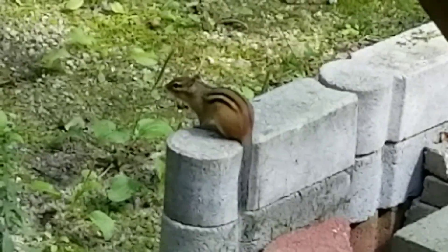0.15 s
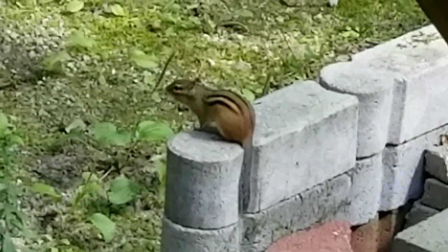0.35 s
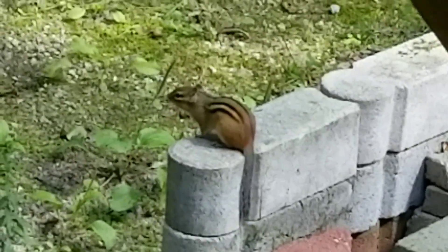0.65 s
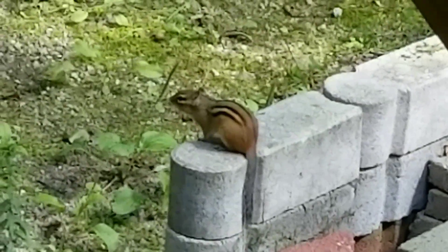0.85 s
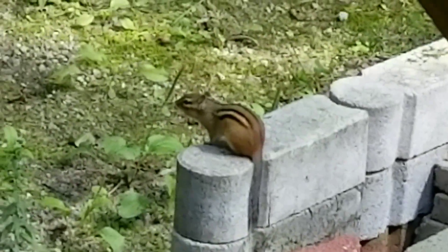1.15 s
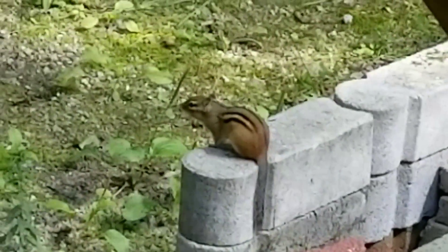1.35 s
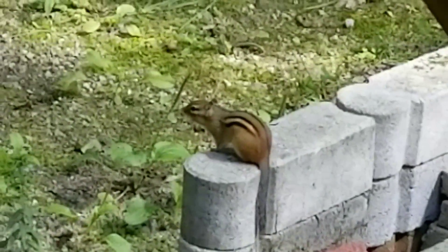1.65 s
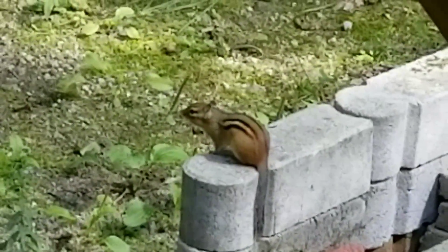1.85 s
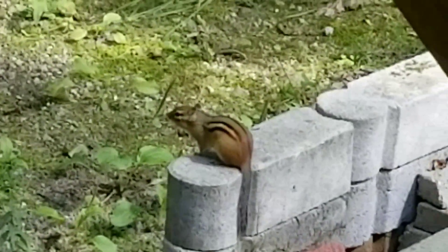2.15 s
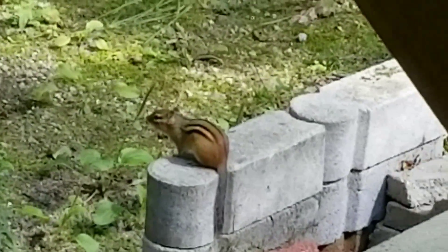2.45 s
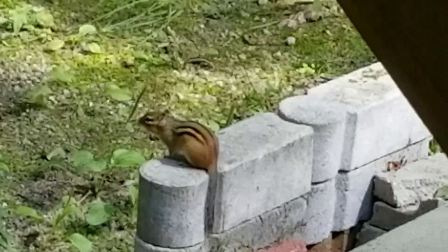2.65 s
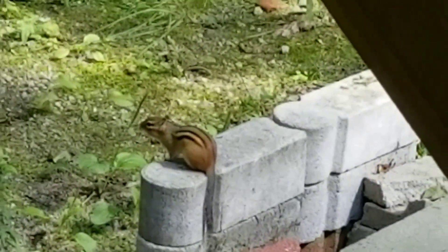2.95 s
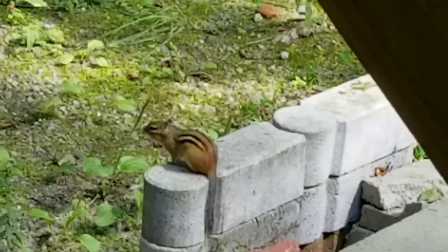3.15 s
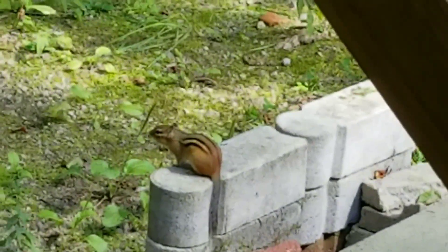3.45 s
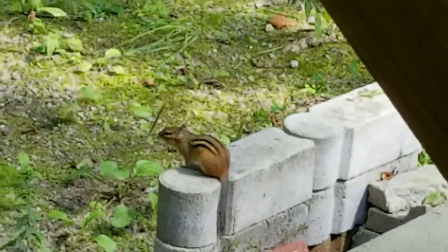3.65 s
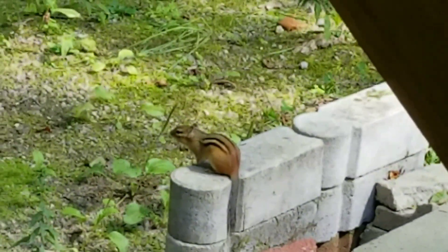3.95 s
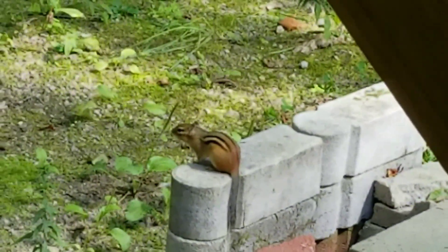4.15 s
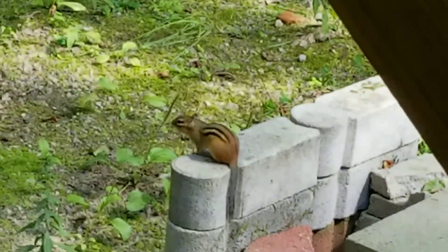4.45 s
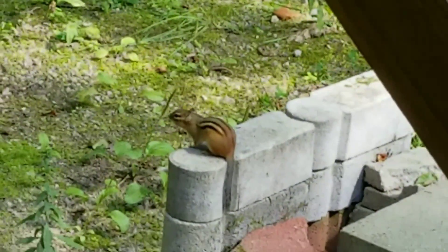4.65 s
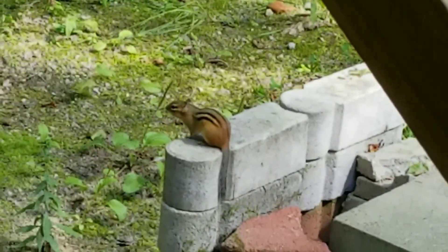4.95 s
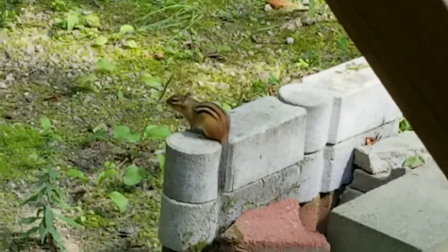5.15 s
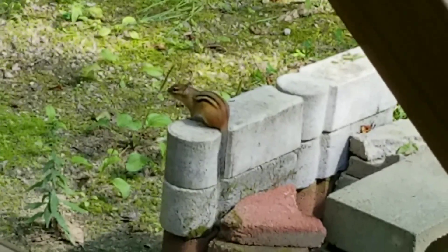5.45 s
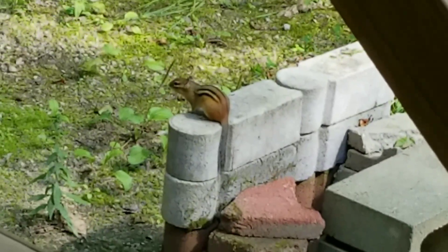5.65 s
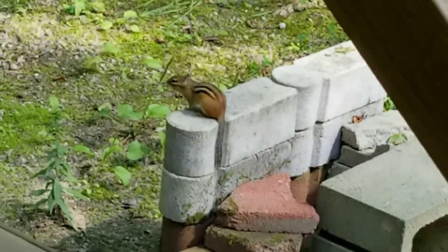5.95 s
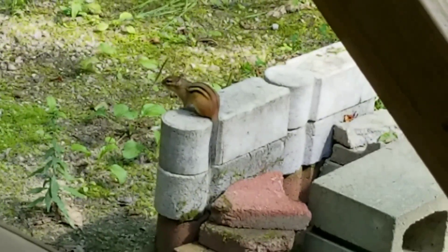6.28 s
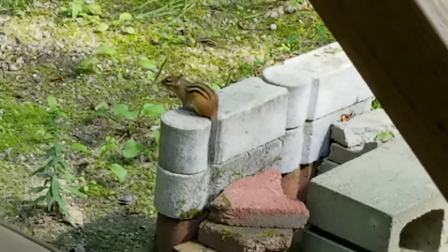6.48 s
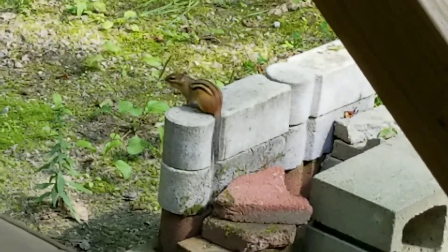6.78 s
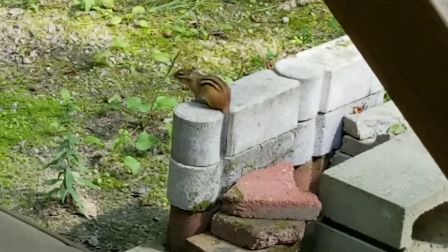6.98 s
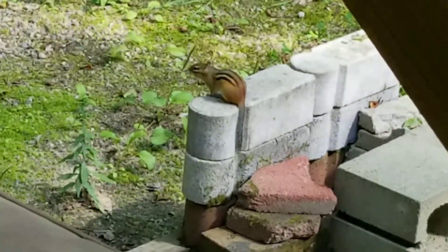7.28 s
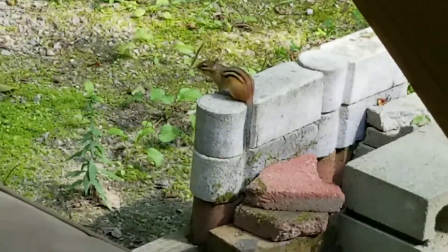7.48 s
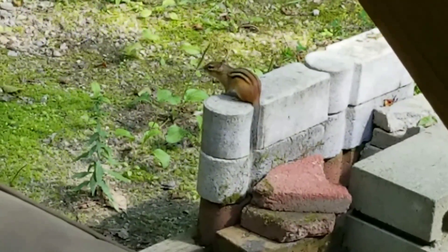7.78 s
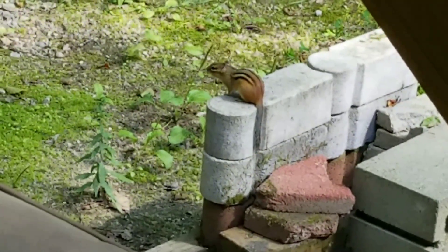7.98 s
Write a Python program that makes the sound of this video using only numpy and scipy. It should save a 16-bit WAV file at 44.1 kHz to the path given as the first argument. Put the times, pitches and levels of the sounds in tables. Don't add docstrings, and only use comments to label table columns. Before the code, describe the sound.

For about 8 seconds a chipmunk calls from a garden wall near a house, heard on a handheld phone a few metres away. The first sharp chip lands right at 0 s, followed by others at about 0.4, 0.8, 1.2 and 1.65 s, then every 0.4 to 0.5 s until the last near 7.7 s. Each lasts only a few hundredths of a second: a bright whistle dives from about 9 kHz to below 2 kHz and ends in a tiny cluck. Close walls add tight, clattery echoes; the yard leaves a faint tail. Underneath, very quiet, a compressor hums and beats, traffic rumbles, distant engines swell and fade, and hiss stays steady. A soft hand thump comes at 2 s, leaves stir at 4 and 7.9 s, and barely audible distant birds sound around 1.4 and 7.5 s.

```python
import sys
import numpy as np
from scipy import signal
from scipy.fft import rfft, irfft, next_fast_len
from scipy.io import wavfile
from scipy.ndimage import uniform_filter1d, map_coordinates

SR = 44100
rng = np.random.default_rng(int(sys.argv[2]) if len(sys.argv) > 2 else 0)


def boost(x):
    u = np.asarray(x, float) / 20
    return 10 ** u


def wav_out(sig):
    wavfile.write(sys.argv[1], SR, np.round(np.clip(np.atleast_2d(sig).T, -1, 1) * 32767).astype(np.int16))


N = 358091


def unit(x):
    return x / np.sqrt(np.mean(x ** 2) + 1e-20)


def along(points, hz):
    f, v = np.transpose(points)
    return np.interp(np.log(hz + 1), np.log(f + 1), v)


def curve(points):
    return np.interp(np.arange(N) / SR, *np.transpose(points))


def wobble(rate):
    coarse = np.arange(0, N + 64, 64)
    knots = rng.standard_normal(int(N * rate / SR) + 4)
    return np.interp(np.arange(N), coarse, map_coordinates(knots, [coarse * rate / SR]))


# freq_hz [Hz], left_right_likeness [-1..1]
ALIKE = [(60, 1.0), (240, 1), (950, 0.93), (3770, 0.85), (15000, 0.83)]


def rush(spectrum, patchy_db):
    hz, t, z = signal.stft(rng.standard_normal((2, N)), SR, nperseg=2048)
    field = rng.standard_normal(z.shape[1:])
    field = uniform_filter1d(uniform_filter1d(field, size=12, axis=0), size=4, axis=1)
    angle = np.arccos(np.clip(along(ALIKE, hz), -1, .995)) / 2
    mid_side = boost(along(spectrum, hz)) * [np.cos(angle), np.sin(angle)]
    z *= boost(patchy_db * unit(field)) * mid_side[:, :, None]
    mid, side = signal.istft(z, SR, nperseg=2048)[1][:, :N]
    return unit(np.array([mid + side, mid - side]))


# time_s [s], level_db [dB]
AIR = [(0.0, -66), (1.4, -66.5), (1.7, -68), (2.96, -67), (3.1, -65), (3.5, -68), (4.14, -66), (5.43, -68),
       (8.12, -67.5)]
# freq_hz [Hz], density_db [dB per Hz]
TRAFFIC = [(15, -34.5), (25, -9.5), (48, -6.5), (69, -3), (130, -10), (237, -15.5), (637, -19),
           (810, -30.5), (900, -30), (1170, -82.5), (1980, -120)]
# freq_hz [Hz], density_db [dB per Hz]
HISS = [(410, -41), (700, -7.5), (851, -9.5), (1100, -6.5), (1190, -3), (1380, -15.5), (1680, -4.5),
        (2040, -11), (2580, -15), (3720, -20), (4340, -13.5), (8230, -22.5), (10400, -19.5), (15800, -23)]
TRAFFIC_DB, HISS_DB = 5, -71.5


def background():
    traffic_level = boost(curve(AIR) + TRAFFIC_DB + 1.1 * wobble(7.1))
    traffic = traffic_level * rush(TRAFFIC, patchy_db=1.0)
    return traffic + boost(HISS_DB) * rush(HISS, patchy_db=-1.7)


# middle_s [s], length_s [s], level_db [dB], pitch_hz [Hz]
DRONES = [(.1, .6, -73, 434), (.62, .3, -71, 431), (.92, .45, -66.5, 432), (1.4, .8, -73, 433),
          (2.45, .6, -75, 432), (3.1, .8, -66.5, 432), (4.3, 1.2, -74, 434), (6.5, .8, -76, 435),
          (7.8, .7, -77, 430), (7.2, 2.6, -71, 137), (6.2, 3.6, -71, 96), (1.5, 3.5, -75, 96)]


def drones():
    t, out = np.arange(N) / SR, np.zeros(N)
    shake, drift = boost(2 * wobble(9)), .9 * wobble(6)
    for s, length, db, hz in DRONES:
        on = abs(t - s) < length / 2
        swell = np.cos(np.pi * (t[on] - s) / length) ** 2
        out[on] += boost(db) * swell * np.sin(2 * np.pi * hz * t[on] + drift[on])
    return np.sqrt(2) * shake * out


# time_s [s], shaft_hum_db [dB rms]
LOAD = [(0.0, -63), (0.27, -55), (1.11, -67), (1.67, -58.5), (1.79, -66), (1.99, -54.5), (4.57, -63),
        (4.95, -55.5), (5.38, -58.5), (6.76, -58.5), (7.17, -71.5), (7.4, -60.5), (8.05, -60), (8.12, -71)]
# multiple_of_shaft_rate [ratio], level_db [dB rms]
WHINE = [(8.19, -78.5), (10.03, -113), (11.04, -81), (15, -80.5), (18, -93.5), (21.03, -83), (25.02, -82.5),
         (27.99, -82.5), (28.99, -80), (31.01, -87.5), (33.04, -85.5)]
MOTOR_HZ, MAINS_HZ = 58.5, 119.97
CANCEL_S = 2.09
MAINS_DB, TWICE_DB, THRICE_DB = -68, -70.5, -83


def compressor():
    t = np.arange(N) / SR
    turn = 2 * np.pi * MOTOR_HZ * (t - CANCEL_S)
    hum = boost(curve(LOAD) + 0.66 * wobble(3.2)) * np.sin(turn + .3 * wobble(8.7))
    hum += boost(THRICE_DB) * np.sin(3 * turn)
    mains = boost(MAINS_DB) * np.sin(2 * np.pi * MAINS_HZ * (t - CANCEL_S))
    beat = mains - boost(TWICE_DB + 0.83 * wobble(2)) * np.sin(2 * turn)
    whine = sum(boost(db + 1.5 * wobble(4)) * np.sin(k * turn + 0.4 * wobble(6)) for k, db in WHINE)
    return np.sqrt(2) * (hum + beat + whine)


# start_s [s], level_db [dB], low_hz [Hz], high_hz [Hz], length_s [s]
RUSTLES = [
    (1.99, -52, 70, 150, .024),
    (4.005, -63.5, 600, 1100, .11),
    (4.01, -70, 1200, 2900, .09),
    (1.40, -72, 3800, 4150, .32),
    (7.45, -76, 3050, 3400, .36),
    (7.83, -75, 2200, 3800, .29),
    (7.88, -72, 700, 1300, .24),
]


def rustles():
    out, t = np.zeros(N + SR), np.arange(SR) / SR
    for s, db, low_hz, high_hz, length in RUSTLES:
        grain_db = 3 * rng.standard_normal(SR // 64 + 1).repeat(64)[:SR]
        grains = rng.standard_normal(SR) * boost(grain_db)
        resonance = signal.butter(2, [low_hz, high_hz], "bandpass", fs=SR, output="sos")
        puff = np.sin(np.pi * np.clip(t / length, 0, 1)) ** 2
        out[round(s * SR):][:SR] += boost(db) * unit(signal.sosfilt(resonance, grains)) * puff
    return out[:N]


# delay_s [s], level_db [dB at 5 kHz], brightness [dB per octave]
PATHS = [(0, -3.5, -4.5), (.0007, -25.5, 13), (.0017, -13, -4.5), (.0025, -23, -12), (.0034, 1, -4),
         (.0044, -5, 1.5), (.0063, -13.5, -7), (.0090, -8, 6), (0.012, -9, 8.5), (0.0147, -10, 9),
         (0.0187, -14.5, 6), (0.0214, -9, 1.5), (0.022, -13.5, -9.5), (0.0255, -16.5, -2),
         (0.033, -21, -12), (0.0358, -16, -8)]
# freq_hz [Hz], gain_db [dB]
BEAM = [(1200, 3), (2400, 5), (3500, -8), (4600, 1), (6200, 1.5), (9000, 2), (12000, 11), (15000, 16)]
# delay_s [s], level_db [dB]
HOUSE = [(.0082, -4.5), (.0128, -6.5), (.0265, -10)]
HOUSE_HZ = 1700
ECHO_BASS_DB = -5
SHAKE_DB = 1.1
PAN_DB, PAN_SCATTER_DB = .6, 1.0


def paths(s, hz, shake):
    delay, level_db, tilt_db = np.transpose(PATHS)
    octaves = np.log2(np.clip(hz, 1200, 14000) / 5000)
    gain = boost((level_db + SHAKE_DB * shake[:, 0])[:, None] + np.outer(tilt_db, octaves))
    gain[0] *= boost(along(BEAM, hz))
    gain[1:] *= boost(ECHO_BASS_DB * np.log2(3000 / np.clip(hz, 1000, 3000)))
    delay = delay + 5e-5 * s * (delay > .002)
    arrival = gain * np.exp(-2j * np.pi * np.outer(delay + 1.5e-5 * shake[:, 1], hz))
    bass = sum(boost(db) * np.exp(-2j * np.pi * late * hz) for late, db in HOUSE)
    bass = bass / (1 + (hz / HOUSE_HZ) ** 6)
    pan = boost(np.outer([.5, -.5], PAN_DB + PAN_SCATTER_DB * shake[:, 2]))
    return pan @ arrival + bass


def tail(decays, noise, rise):
    hz, t, z = signal.stft(noise, SR, nperseg=256)
    decay = boost(-60 * t / along(decays, hz)[:, None])
    out = signal.istft(z * decay, SR, nperseg=256)[1][:, :noise.shape[1]]
    out *= 1 - np.exp(-np.arange(out.shape[1]) / SR / rise)
    return out / np.linalg.norm(out[0])


BLOCK, BLOCK_START = 1024, 598


def smear(chip, start, blur):
    attack = round(.03 * SR)
    early = (start + attack - BLOCK_START) % BLOCK
    since = np.arange(4096) - attack + early
    noise = irfft(abs(rfft(chip[:, :4096])) * np.exp(2j * np.pi * blur))
    level_db = -14.5 - np.clip((early - 560) / 14, 0, 15)
    return boost(level_db) * noise * np.clip(since / 30, 0, 1) * np.clip((1500 - since) / 500, 0, 1)


# since_5khz_s [s from the 5 kHz passage], pitch_hz [Hz]
FALL = [(-.0185, 9000), (-.0130, 8830), (-.0090, 8380), (-.0063, 7700), (-.0033, 6727), (.0003, 5272),
        (.0026, 4632), (.0098, 3200), (.0185, 1750)]
# since_5khz_s [s from the 5 kHz passage], effort_db [dB]
EFFORT = [(-.0205, -72), (-.0180, -20.5), (-.0135, -12), (-.0115, -11), (-.0092, -6.5), (.0022, 1),
          (.0078, -8.5), (0.0117, -27.5), (.0178, -30.5)]
# multiple [ratio], level_db [dB]
OVERTONES = [(2, -11.3), (3, -21)]
FADE_S = .0025
CLUCK_S, CLUCK_ATTACK_S, CLUCK_HOLD_S, CLUCK_RELEASE_S = .0180, .0030, .0036, .0028
CLUCK_DB, CLUCK_HZ, CLUCK_SAG_HZ_PER_S = -26.5, 1330, 20000


def whistle(first_hz, stretch, cluck_db, flutter):
    t = np.arange(4096) / SR - .03
    lead = np.clip(-t / .018, 0, 1) ** 2
    warped = t / (1 + (stretch - 1) * lead)
    since = t - CLUCK_S
    hz = np.interp(warped, *np.transpose(FALL)) + (first_hz - FALL[0][1]) * lead ** 1.5
    hz = np.where(since > 0, CLUCK_HZ - CLUCK_SAG_HZ_PER_S * since, hz)
    phase = 2 * np.pi * np.cumsum(hz) / SR
    tone = np.sin(phase)
    for k, db in OVERTONES:
        audible = np.clip((20000 - k * hz) / 2000, 0, 1)
        tone = tone + boost(db) * np.sin(k * phase) * audible
    end = CLUCK_ATTACK_S + CLUCK_HOLD_S + CLUCK_RELEASE_S
    cluck = np.clip(np.minimum(since / CLUCK_ATTACK_S, (end - since) / CLUCK_RELEASE_S), 0, 1) ** 2
    breath = boost(np.interp(warped, *np.transpose(EFFORT), -120, -120)) * np.clip(-since / FADE_S, 0, 1)
    level = breath + boost(CLUCK_DB + cluck_db) * cluck
    uneven_db = .9 * map_coordinates(flutter, [np.arange(4096) / 70])
    return level * boost(uneven_db) * tone


# at_5khz_s [s], level_db [dB], first_pitch_hz [Hz], lead_in_stretch [ratio], cluck_db [dB]
CHIPS = [(-.0230, -22.5, 9150, 1.18, -2.5), (0.3956, -23, 9930, 1.16, -1.5), (0.8017, -23, 8810, 0.86, -2),
         (1.2021, -23, 8710, 0.96, -3), (1.6556, -23.5, 9340, 1.04, -3), (2.0734, -23, 9150, 0.92, -1),
         (2.5219, -23.5, 9430, 1.08, -1.2), (2.959, -23.5, 8800, 0.89, -2), (3.381, -23.5, 9160, 1.08, -2),
         (3.7931, -23, 8900, .94, -1.2), (4.2443, -23.5, 9320, 0.99, -3.5),
         (4.6862, -23.5, 9150, 0.93, 1.1), (5.1254, -23.5, 8940, 0.93, 0), (5.5200, -23, 8770, 0.94, -1),
         (5.9365, -23, 8640, 0.93, -1), (6.377, -23.5, 9100, 1.07, 0), (6.7905, -23.5, 9230, 0.94, -2),
         (7.2494, -23, 8730, 0.94, -2), (7.7347, -23.5, 8720, 1.04, 1.5)]
# freq_hz [Hz], gain_db [dB]
COLOUR = [(850, 24.5), (1200, -7), (2000, -7.5), (2950, -16.5), (3800, -3.5), (4500, 1.4), (5200, -4),
          (5900, -7), (7400, 0), (9000, -9.5), (10200, -18.5), (11500, -24), (12900, -2), (15500, -8)]
# freq_hz [Hz], t60_s [s]
NOOK = [(1000, 0.54), (4500, 0.18), (8000, 0.18), (14000, 0.13)]
# freq_hz [Hz], level_db [dB]
SCATTER = [(1200, -4), (2500, 6.5), (4500, -5.5), (8000, 1.5), (14000, 11)]
# freq_hz [Hz], t60_s [s]
YARD = [(1000, 1), (4500, 0.69), (8000, 0.67), (14000, 0.7)]
# time_s [s], left_minus_right_db [dB]
TURN = [(0, .4), (2.2, .2), (2.8, .7), (5, .9), (5.8, 1.4), (8.1, 1.4)]
THROAT_LOW_HZ = 1020


def chipmunk():
    near, far, pad = 12288, 2 ** 15, SR // 10
    hz, far_hz = np.fft.rfftfreq(near, 1 / SR), np.fft.rfftfreq(far, 1 / SR)
    bass_cut = 1 / (1 + (THROAT_LOW_HZ / (far_hz + 1)) ** 12)
    ports = np.array([[1], [-1]])
    out = np.zeros((2, N + far + pad))
    still_nook = rng.standard_normal((2, near - 4096))
    still_yard = rng.standard_normal((2, far - 8192))
    for s, db, *shape in CHIPS:
        voice = whistle(*shape, rng.standard_normal(64))
        nook = 1.3 * still_nook + 0.26 * rng.standard_normal(still_nook.shape)
        yard = .7 * still_yard + .7 * rng.standard_normal(still_yard.shape)
        nook, yard = (pair[0] + 0.19 * pair[1] * ports for pair in (nook, yard))
        scattered = boost(along(SCATTER, hz)) * rfft(tail(NOOK, nook, rise=0.011), near)
        single = paths(s, hz, rng.standard_normal((len(PATHS), 3)))
        echoes = irfft(rfft(voice, near) * (single + scattered), near)
        ringing = boost(-10) * rfft(voice, far) * rfft(tail(YARD, yard, rise=0.014), far)
        swing_db = np.interp(s, *np.transpose(TURN)) * ports / 2 * np.clip(far_hz / 3000 - .6, 0, 1)
        colour = boost(db + along(COLOUR, far_hz) + swing_db) * bass_cut
        chip = irfft((rfft(echoes, far) + ringing) * colour, far)
        start = round((s - .03) * SR)
        chip[:, :4096] += smear(chip, start, rng.random((2, 2049)))
        out[:, pad + start:][:, :far] += chip
    return out[:, pad:pad + N]


def scene():
    return background() + drones() + compressor() + rustles() + chipmunk()


def top_cut(x):
    return signal.sosfilt(signal.butter(12, 16480, fs=SR, output="sos"), x)


TOP_HZ = 16150


def record(dry):
    size = next_fast_len(N)
    slope = np.clip((TOP_HZ - np.fft.rfftfreq(size, 1 / SR)) / 500, 0, 1)
    kept = irfft(rfft(dry, size) * slope, size)[:, :N]
    return top_cut(kept)


dry = scene()
out = record(dry)
wav_out(out)
```